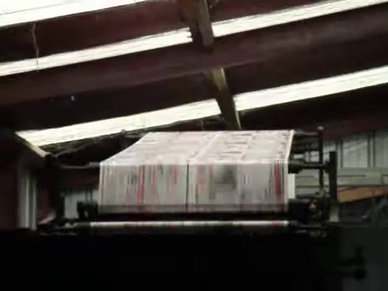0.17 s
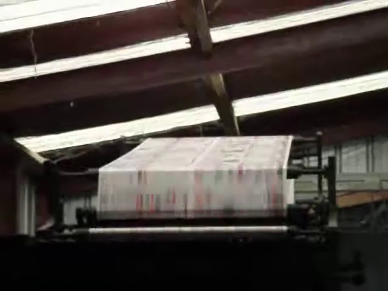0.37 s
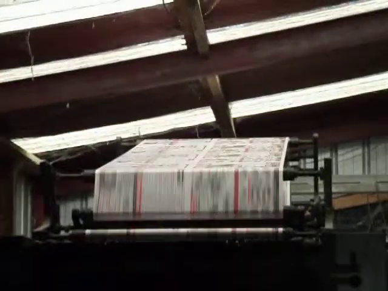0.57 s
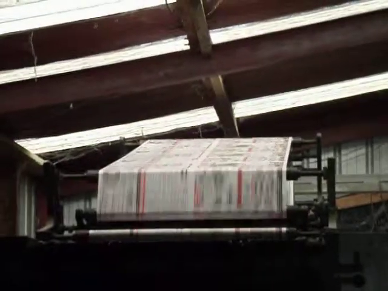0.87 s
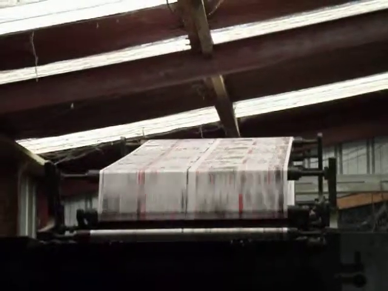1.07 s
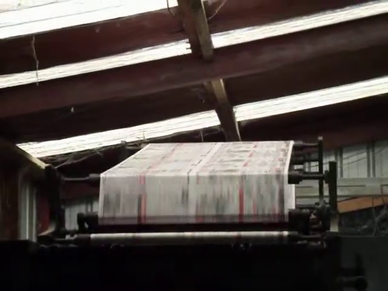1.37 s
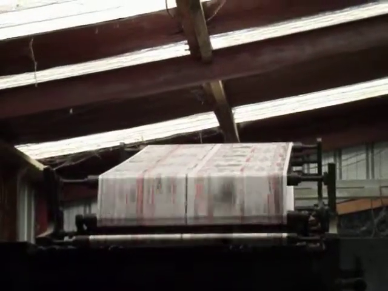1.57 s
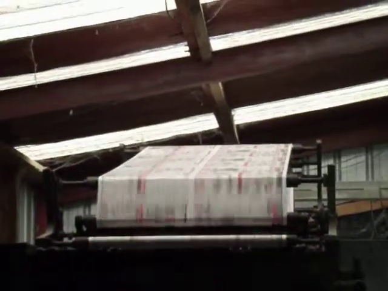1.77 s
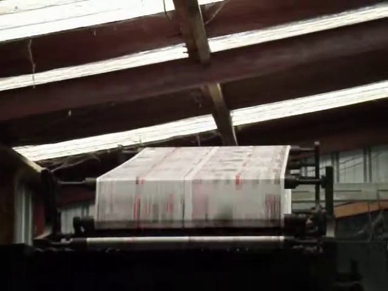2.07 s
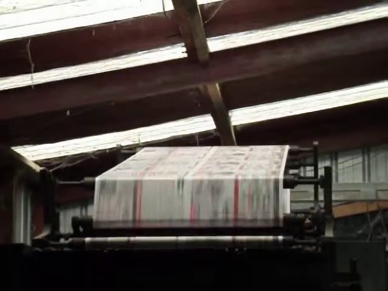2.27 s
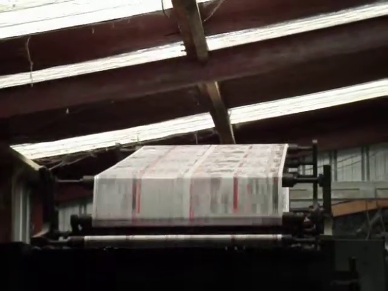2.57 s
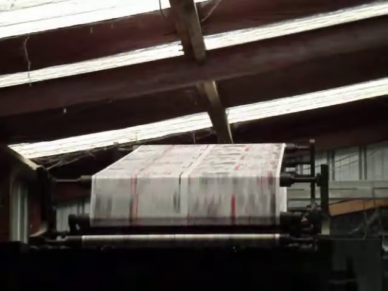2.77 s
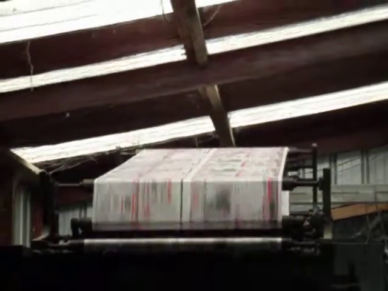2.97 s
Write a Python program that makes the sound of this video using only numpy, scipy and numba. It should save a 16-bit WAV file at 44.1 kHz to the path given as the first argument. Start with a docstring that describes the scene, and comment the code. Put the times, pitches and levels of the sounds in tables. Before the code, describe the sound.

Web printing press already at full speed, its soft heavy thuds and gear rumble cycling under rushing rollers and paper, ticking loose parts, hum and a whine that comes and goes; shed echo, narrow, limited, dull treble.

```python
"""Low knocks and gear rumble repeat on every turn of a web printing press at steady speed in a big shed. The
knocks are short cosine bursts that ring the frame; the gears are one turn of noise, looped. Over them lie
linkage clacks, a ringing part, roaring rollers and paper and ticking loose parts (noise), and steady frame
tones, drive hum and roller whine (wavering sines). A small overloaded recorder narrows and limits it all."""
import sys
import numpy as np
from scipy import signal
from scipy.fft import rfft, irfft
from scipy.io import wavfile
from scipy.ndimage import uniform_filter1d
from numba import njit

SR = 44100
rng = np.random.default_rng(int(sys.argv[2]) if len(sys.argv) > 2 else 0)


def waveform_to_disk(signal):
    """Save audio, clipped to [-1, 1], as 16-bit WAV at the path in sys.argv[1]."""
    frames = np.transpose(np.atleast_2d(signal))
    scaled = np.clip(frames, -1, 1) * 32767
    samples = np.round(scaled).astype(np.int16)
    wavfile.write(sys.argv[1], SR, samples)


N = 138033
TIME_S = np.arange(N) / SR
TURN_S = .28449


def undb(db):
    """Decibels to gain."""
    return 10 ** (np.asarray(db) / 20)


def level(x, rms_db):
    """Set the rms level."""
    return x * undb(rms_db) / np.sqrt(np.mean(x ** 2))


def colour(x, points):
    """Filter by (Hz, dB) points, joined by lines over log frequency."""
    point_hz, point_db = np.array(points, float).T
    bin_hz = np.maximum(np.arange(len(x) // 2 + 1) * SR / len(x), 1)
    gain_db = np.interp(np.log(bin_hz), np.log(point_hz), point_db)
    return irfft(rfft(x) * undb(gain_db), len(x))


def walk(rate_hz):
    """Slow random drift about 0: clipped random levels, held 1 / rate_hz s and smoothed twice."""
    hold = max(int(SR / rate_hz), 2)
    held = np.clip(rng.standard_normal(N), -2, 2)[np.arange(N) // hold]
    return 1.3 * uniform_filter1d(uniform_filter1d(held, hold), hold)


def turns():
    """Start times of the cylinder turns, from one turn before time 0."""
    return np.arange(-1, int(N / SR / TURN_S) + 1) * TURN_S


def swing(loudest_s, depth_db):
    """A gain that rises and falls once a turn."""
    return undb(depth_db * np.cos(2 * np.pi * (TIME_S - loudest_s) / TURN_S))


def tone(hz, waver_hz, waver_db):
    """A sine of rms near 1 that wavers in pitch and level."""
    phase = 2 * np.pi * np.cumsum(hz + waver_hz * walk(14)) / SR
    return np.sqrt(2) * np.sin(phase) * undb(waver_db * walk(18))


# Cylinder knocks in one turn: peak_s, level_db (before KNOCK_DB), pitch_hz
CYLINDER_KNOCKS = [(.0912, -13, 173), (.1184, -12.5, 196), (.1300, -20, 200), (.1654, -14, 187),
                   (.1740, -15, 290), (.1931, -16, 230), (.2045, -16, 260), (.2540, -19, 340),
                   (.2930, -15, 205), (.3120, -18, 205), (.3190, -18, 260), (.3300, -19, 300),
                   (.3425, -15, 165), (.3520, -9, 210)]
KNOCK_DB, KNOCK_SCATTER_DB = -2, .7
KNOCK_RISE_S, KNOCK_FALL_S, KNOCK_JITTER_S = .0045, .007, .00015


def knocks():
    """Soft heavy blows, once a turn: each swells in a few ms and dies within a cycle or two."""
    out = np.zeros(N)
    starts_s = turns()
    for peak_s, level_db, pitch_hz in CYLINDER_KNOCKS:
        chances = rng.standard_normal((len(starts_s), 2))
        for start_s, (late, strong) in zip(starts_s, chances):
            centre_s = peak_s + start_s + KNOCK_JITTER_S * late
            a, b = np.searchsorted(TIME_S, [centre_s - .02, centre_s + .05])
            age_s = TIME_S[a:b] - centre_s
            rise = np.exp(-(age_s / KNOCK_RISE_S) ** 2)
            fall = 1 / np.cosh(2 * age_s / KNOCK_FALL_S)
            shape = np.where(age_s < 0, rise, fall)
            gain = undb(KNOCK_DB + level_db + KNOCK_SCATTER_DB * strong)
            out[a:b] += gain * shape * np.cos(2 * np.pi * pitch_hz * age_s)
    return out


# Frame modes rung by the knocks: pitch_hz, width_hz, gain_db
MODES = [(217.5, 18, 1), (331, 14, -4)]


def frame(x):
    """The frame passes each knock on and booms after it at its resonances."""
    ringing = 0
    for pitch_hz, width_hz, gain_db in MODES:
        b, a = signal.iirpeak(pitch_hz, pitch_hz / width_hz, fs=SR)
        ringing = ringing + undb(gain_db) * signal.lfilter(b, a, x)
    return x + ringing


# Gear rumble spectrum: freq_hz, density_db (relative, per Hz)
GEAR_SPECTRUM = [(30, -33), (70, -19.5), (110, -4), (210, -6.5), (330, -0.5), (500, -4.5), (800, -6.5),
                 (1400, -11), (3000, -24.5), (6000, -83)]
GEARS_DB, GEARS_SWING_DB, GEARS_LOADED_S = -26, 2.5, .087


def gears():
    """Rough teeth meet in the same order on every turn, louder on its loaded half."""
    one_turn = colour(rng.standard_normal(int(round(TURN_S * SR))), GEAR_SPECTRUM)
    looped = np.resize(one_turn, N)
    return level(looped * swing(GEARS_LOADED_S, GEARS_SWING_DB), GEARS_DB)


# Linkage clacks in one turn: start_s, level_db (relative)
LINKAGE_CLACKS = [(0.13, -1), (0.155, -5), (0.171, -16.5), (0.231, -2.5), (.255, 2.5), (.301, -7),
                  (.317, -8.5), (0.344, -0.5)]
# Clack spectrum: freq_hz, density_db (relative, per Hz)
CLACK_SPECTRUM = [(150, -9), (330, 3.5), (480, -0.5), (620, 0.5), (850, -1.5), (1500, -15), (4000, -62),
                  (7000, -90.5)]
CLACK_DB, CLACK_FALL_S = -28.5, .0098


def clacks():
    """Short decaying noise blows of the linkage at fixed places in the turn."""
    shape = np.zeros(N)
    for start_s, level_db in LINKAGE_CLACKS:
        age_s = (TIME_S - start_s) % TURN_S
        shape += undb(level_db) * np.exp(-age_s / CLACK_FALL_S)
    return level(colour(shape * rng.standard_normal(N), CLACK_SPECTRUM), CLACK_DB)


# Roller and paper web spectrum: freq_hz, density_db (relative, per Hz)
ROAR_SPECTRUM = [(20, -29.5), (45, -18.5), (65, -17.5), (90, -9), (120, -0.5), (210, 0.5), (400, -1),
                 (650, -2.5), (1000, -5.5), (1650, -6.5), (1950, 0.5), (2300, -2), (2850, 2), (3150, -5.5),
                 (3600, -16), (4000, -21.5), (4500, -32), (5300, -32), (5700, -38), (6100, -51.5)]
ROAR_DB, ROAR_SWELL_DB, ROAR_FLUTTER_DB = -14.5, .83, 1.55


def roar():
    """Rollers and running paper: dense noise that swells a little and flutters."""
    rush = colour(rng.standard_normal(N), ROAR_SPECTRUM)
    waver_db = ROAR_SWELL_DB * walk(6.2) + ROAR_FLUTTER_DB * walk(47)
    return level(rush * undb(waver_db), ROAR_DB)


# Rattle spectrum: freq_hz, density_db (relative, per Hz)
RATTLE_SPECTRUM = [(200, -9), (600, -3), (1300, 1), (2000, -4), (2850, 4.5), (3600, -10.5), (4500, -20),
                   (5400, -20.5), (6100, -41.5)]
RATTLE_PER_S, RATTLE_DB, RATTLE_FALL_S, RATTLE_SCATTER_DB = 170, -21.5, .0033, 1


def rattle():
    """Loose parts tick at random, each tick a brief decaying noise burst."""
    struck = rng.random(N) < RATTLE_PER_S / SR
    strength = undb(RATTLE_SCATTER_DB * np.clip(rng.standard_normal(N), -2, 2))
    decay = np.exp(-1 / (RATTLE_FALL_S * SR))
    shape = signal.lfilter([1], [1, -decay], struck * strength)
    return level(colour(shape * rng.standard_normal(N), RATTLE_SPECTRUM), RATTLE_DB)


RING_HZ, RING_DB = 612, -27.5
RING_AT_S, RING_RISE_S, RING_FALL_S = .147, .015, .047
RING_HOLD = .48  # gain that never dies away, before levelling


def ring():
    """A frame part rings steadily on one pitch and swells anew twice a turn."""
    age_s = (TIME_S - RING_AT_S) % (TURN_S / 2)
    swell = (1 - np.exp(-age_s / RING_RISE_S)) * np.exp(-age_s / RING_FALL_S)
    shape = RING_HOLD + 2 * swell
    return level(shape * tone(RING_HZ, waver_hz=2.405, waver_db=4.5), RING_DB)


# Steady lines: frame modes (77.3 to 330.5 Hz), then drive hum and fainter roller whines: pitch_hz
LINE_HZ = [77.3, 105.5, 307, 330.5, 536, 714.5, 886, 1911, 2953, 4092]
# One row per pitch: level_db, pitch_waver_hz, level_waver_db
LINE_WAVERS = [(-46, 0.6, 3), (-37.5, 0.54, 1), (-37, 0.88, 1.5), (-34, 0.93, 1), (-39.5, 1.4, 7.5),
               (-39, 2.4, 5.5), (-45.5, 2.2, 4), (-31.5, 12, 3), (-29.5, 10, 2.5), (-48.5, 15, 1)]
# Main roller whine: time_s, level_db (before its wavers)
WHINE_LEVELS = [(.1, -29), (.35, -34), (.7, -32), (0.999, -28), (1.25, -31.5), (1.42, -20), (1.602, -27.5),
                (1.75, -33.5), (1.9, -20), (2.052, -25.5), (2.218, -18.5), (2.45, -29), (2.7, -30),
                (3.098, -24)]
WHINE_HZ, WHINE_WAVER_HZ, WHINE_WAVER_DB = 2919, 10, 1
WHINE_ROUGH = .67  # depth of the fast level waver


def whine():
    """Sustained wavering sines, and a rough main roller whine that comes and goes."""
    hum = 0
    for pitch_hz, (level_db, waver_hz, waver_db) in zip(LINE_HZ, LINE_WAVERS):
        hum = hum + undb(level_db) * tone(pitch_hz, waver_hz, waver_db)
    whine_db = np.interp(TIME_S, *np.array(WHINE_LEVELS).T)
    main = undb(whine_db) * tone(WHINE_HZ, WHINE_WAVER_HZ, WHINE_WAVER_DB)
    return hum + main * (1 + WHINE_ROUGH * walk(110))


SHED_T60_S, SHED_DB, KNOCK_SHED_DB = 1, -8, -18


def shed(x, wet_db):
    """Roof and walls add a diffuse tail: convolution with decaying noise of unit energy."""
    age_s = np.arange(SR) / SR
    tail = rng.standard_normal(SR) * np.exp(-np.log(1000) * age_s / SHED_T60_S)
    tail = tail / np.sqrt(np.sum(tail ** 2))
    return x + undb(wet_db) * signal.fftconvolve(x, tail)[:N]


def scene():
    """The whole press, one channel."""
    blows = shed(frame(knocks()), KNOCK_SHED_DB) + shed(clacks() + rattle(), SHED_DB)
    return (blows + gears() + roar() + ring() + whine())[None]


@njit
def peak_follow(size, fall):
    """Jumps to each new peak, then sinks by a fixed share per sample."""
    out, held = np.empty(len(size)), 0.
    for i in range(len(size)):
        held = max(size[i], held * fall)
        out[i] = held
    return out


START_S = .0725  # silence before
INPUT_TOP_HZ, TOP_HZ = 5750, 15900
DRIVE_DB, HISS_DB = .94, -75
LIMIT_LEVEL, LIMIT_RELEASE_S = .74, .013


def record(dry):
    """The recorder starts, takes in a narrow band, hisses, and limits each high peak at once."""
    input_filter = signal.ellip(7, .2, 60, INPUT_TOP_HZ, fs=SR, output="sos")
    narrow = signal.sosfilt(input_filter, dry[0])
    hiss = undb(HISS_DB) * rng.standard_normal(N)
    driven = (narrow * undb(DRIVE_DB) + hiss) * (TIME_S >= START_S)
    over = np.maximum(np.abs(driven) / LIMIT_LEVEL - 1, 0)
    excess = peak_follow(over, np.exp(-1 / (LIMIT_RELEASE_S * SR)))
    limited = driven / (1 + excess)
    output_filter = signal.ellip(8, .2, 70, TOP_HZ, fs=SR, output="sos")
    return signal.sosfilt(output_filter, limited)[None]


dry = scene()
out = record(dry)
waveform_to_disk(out)
```